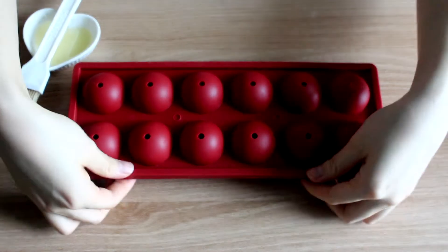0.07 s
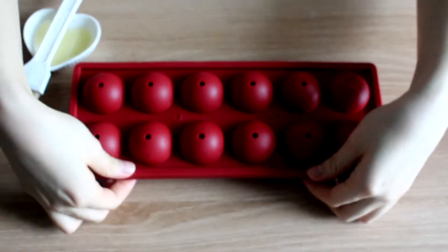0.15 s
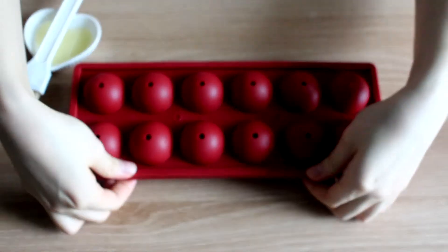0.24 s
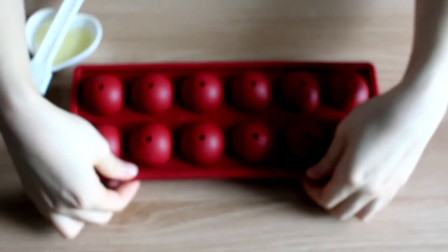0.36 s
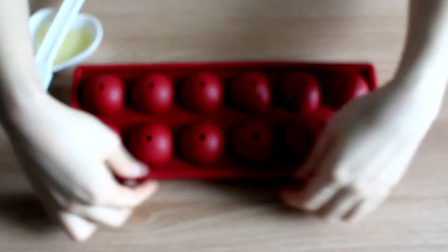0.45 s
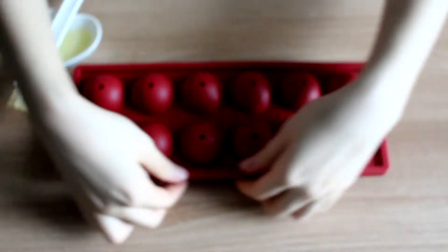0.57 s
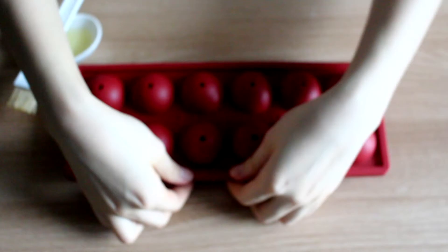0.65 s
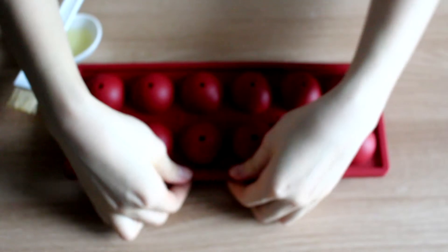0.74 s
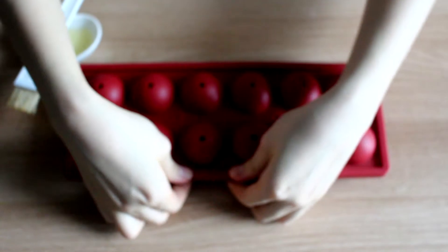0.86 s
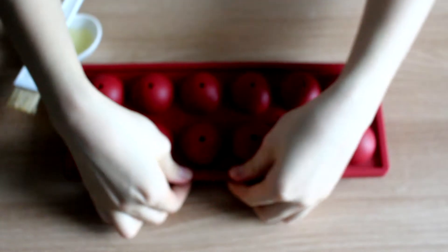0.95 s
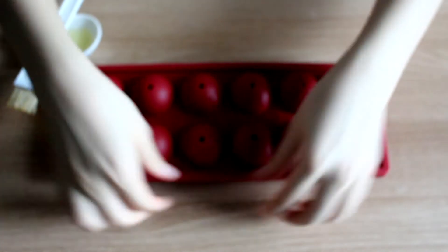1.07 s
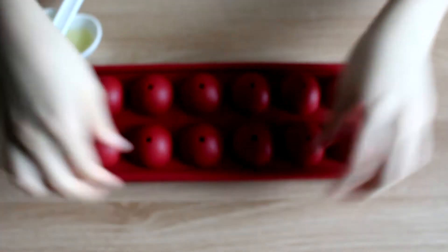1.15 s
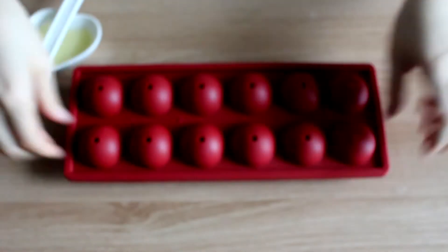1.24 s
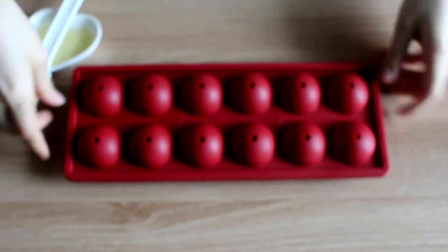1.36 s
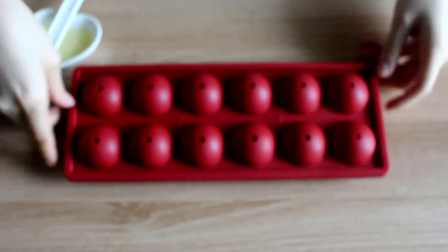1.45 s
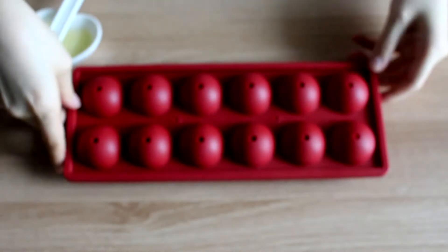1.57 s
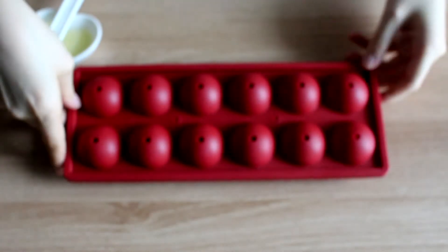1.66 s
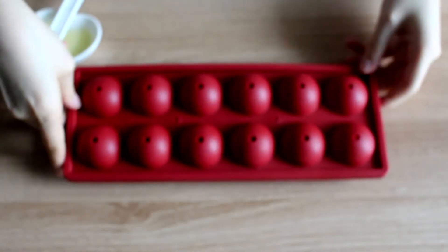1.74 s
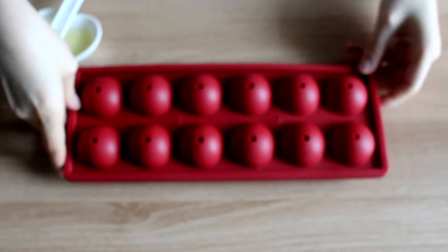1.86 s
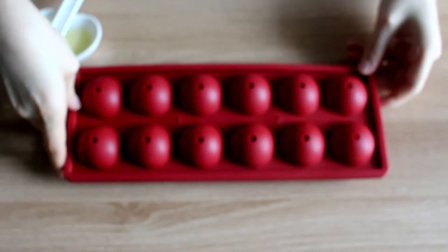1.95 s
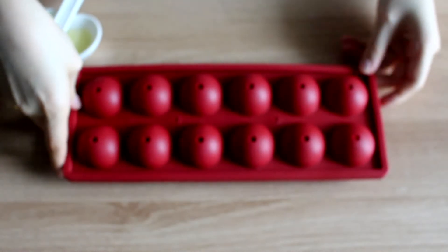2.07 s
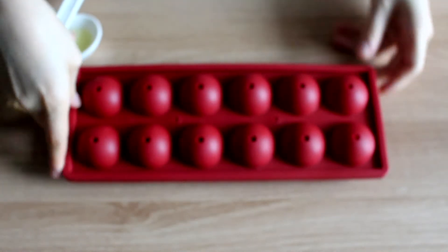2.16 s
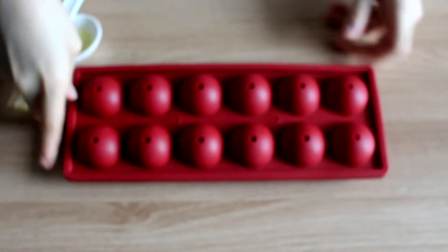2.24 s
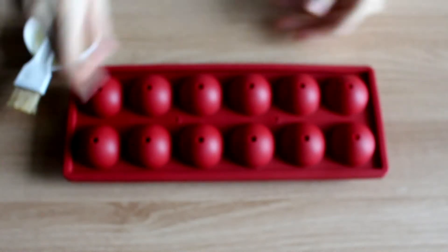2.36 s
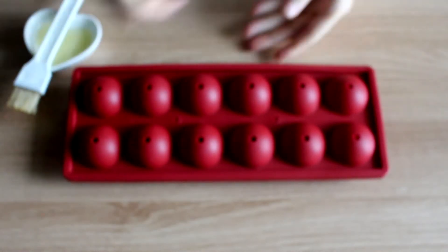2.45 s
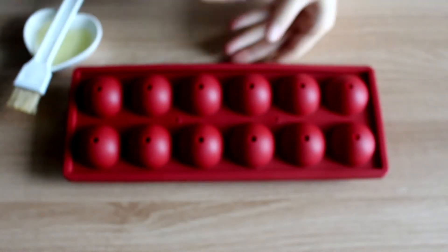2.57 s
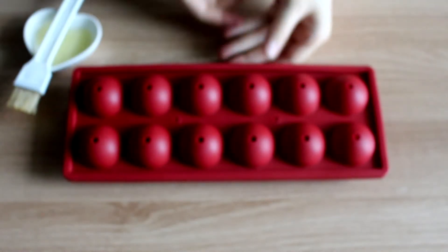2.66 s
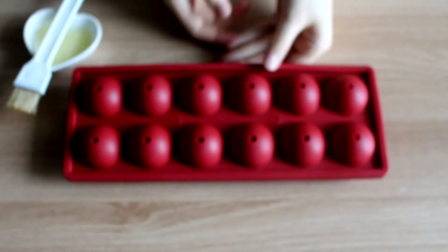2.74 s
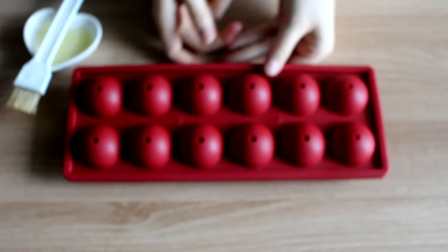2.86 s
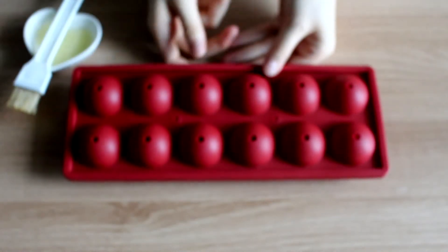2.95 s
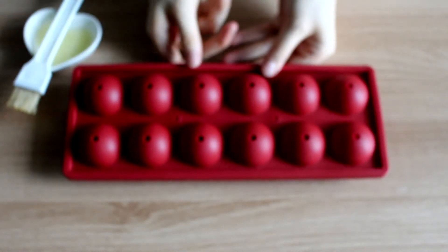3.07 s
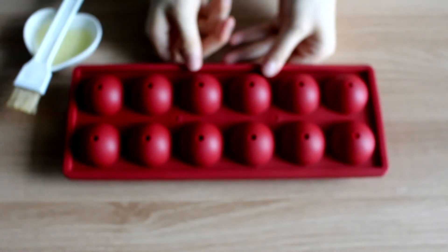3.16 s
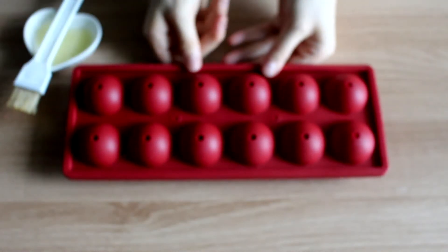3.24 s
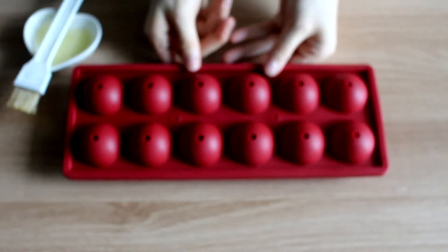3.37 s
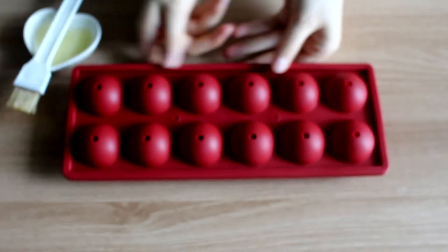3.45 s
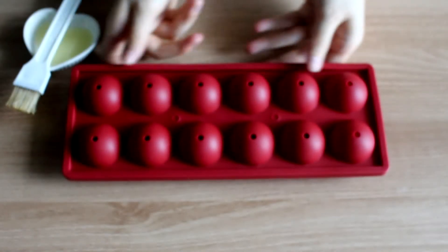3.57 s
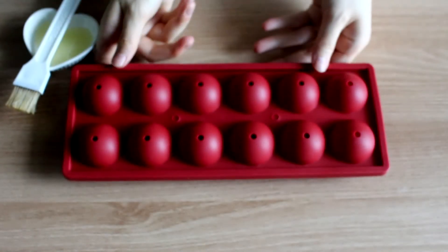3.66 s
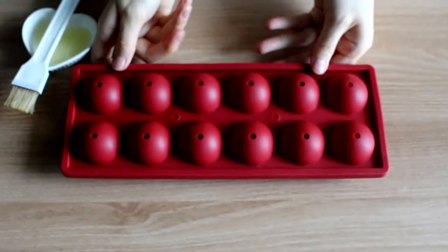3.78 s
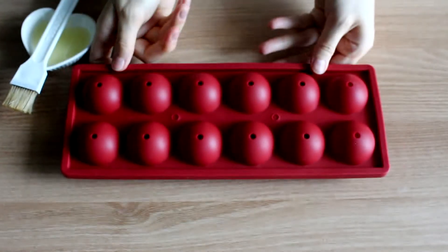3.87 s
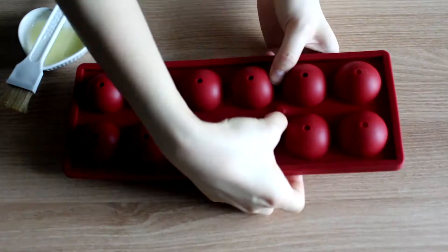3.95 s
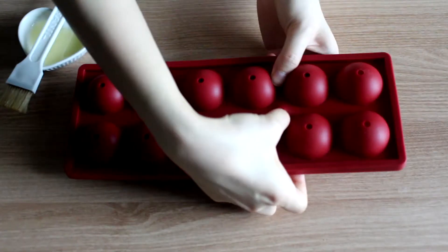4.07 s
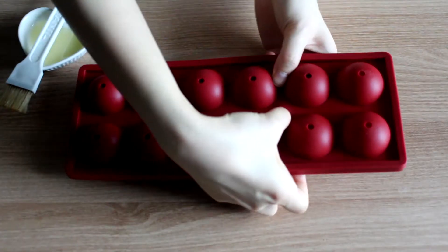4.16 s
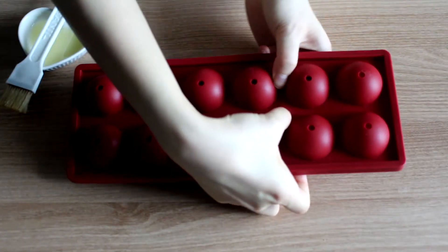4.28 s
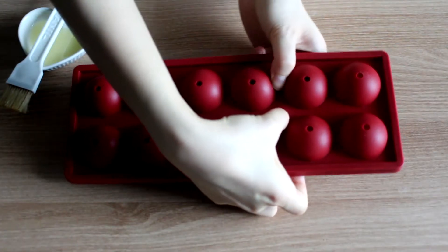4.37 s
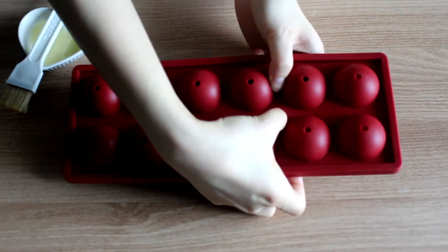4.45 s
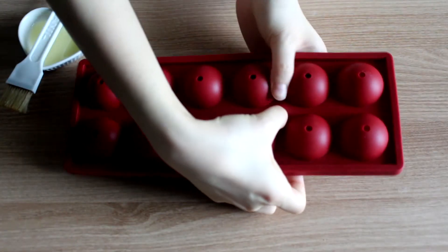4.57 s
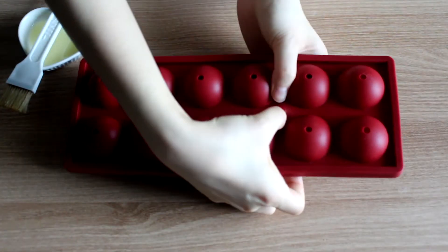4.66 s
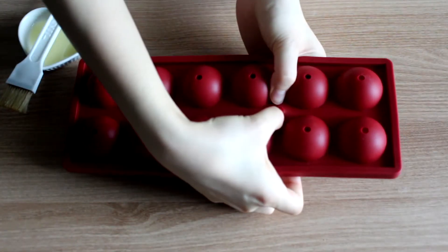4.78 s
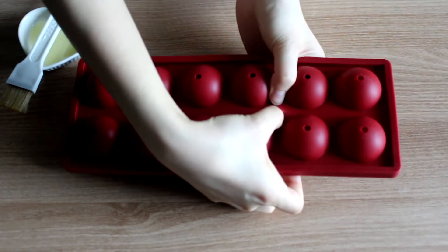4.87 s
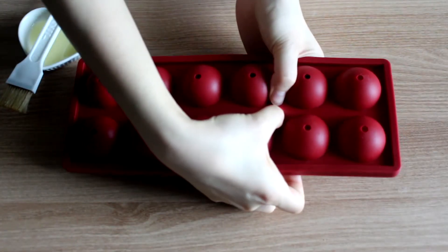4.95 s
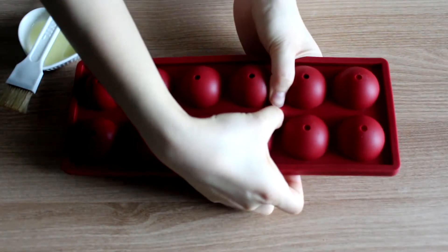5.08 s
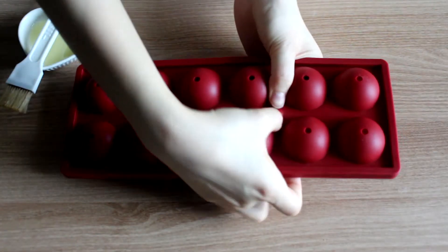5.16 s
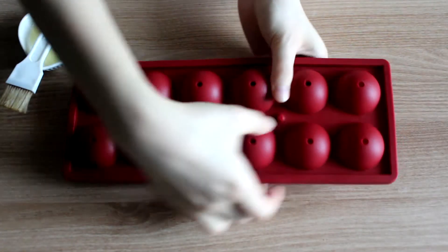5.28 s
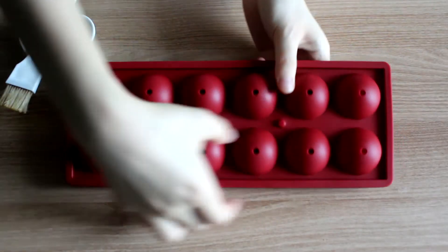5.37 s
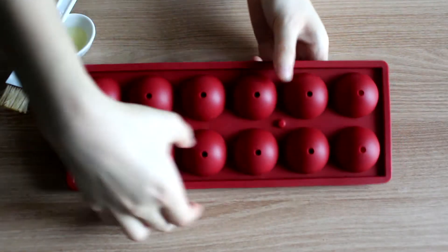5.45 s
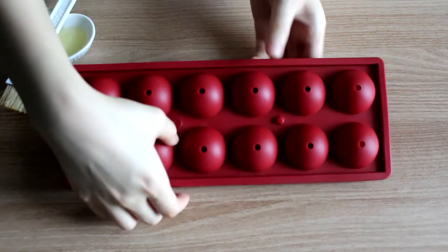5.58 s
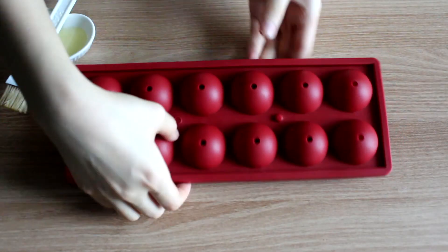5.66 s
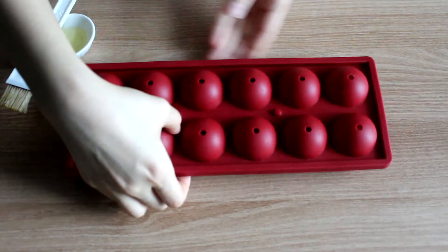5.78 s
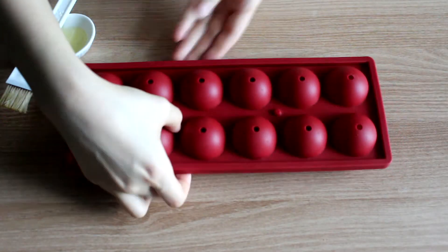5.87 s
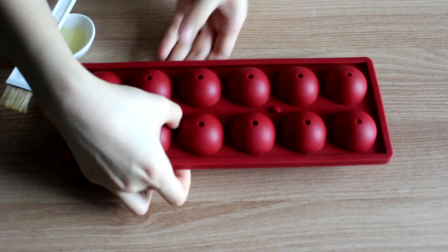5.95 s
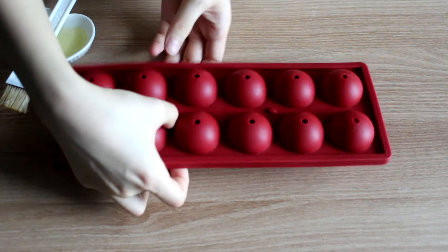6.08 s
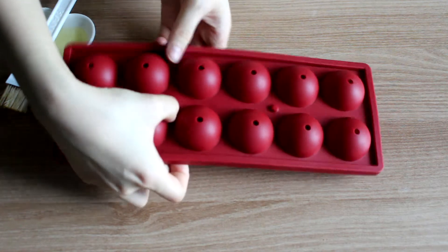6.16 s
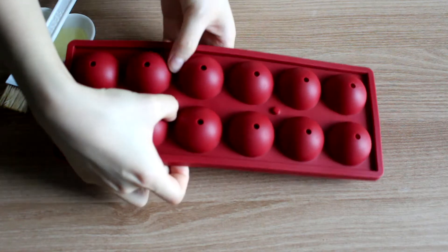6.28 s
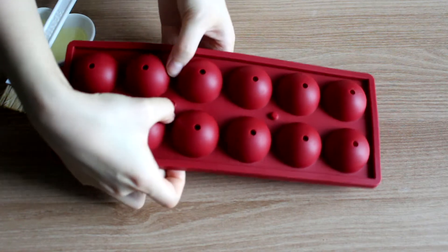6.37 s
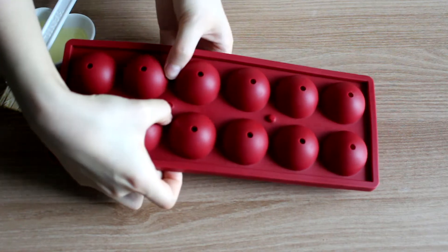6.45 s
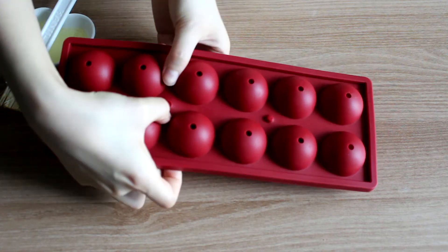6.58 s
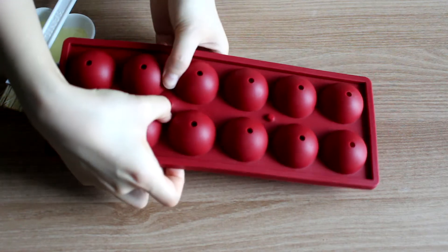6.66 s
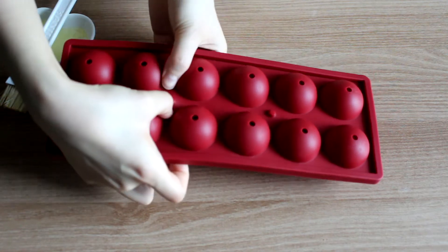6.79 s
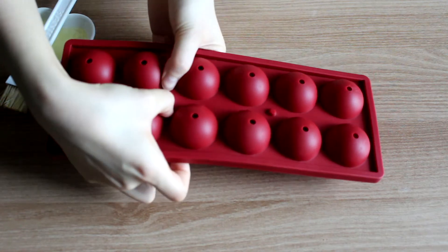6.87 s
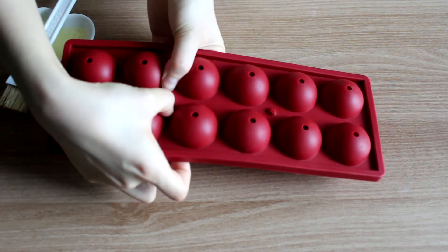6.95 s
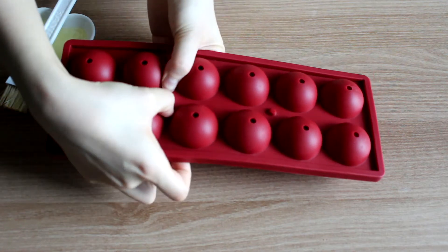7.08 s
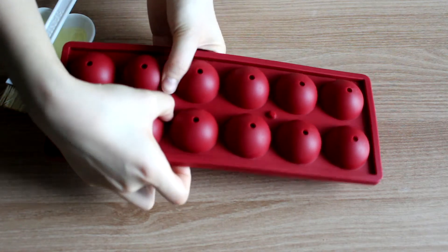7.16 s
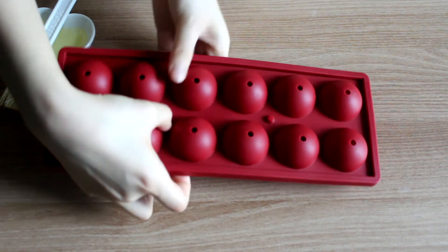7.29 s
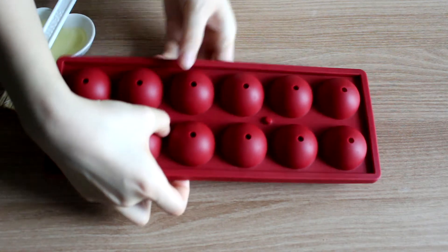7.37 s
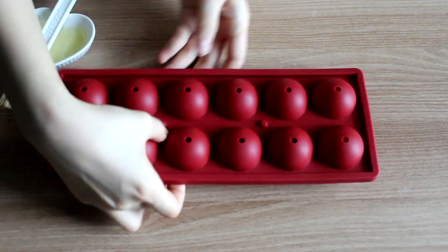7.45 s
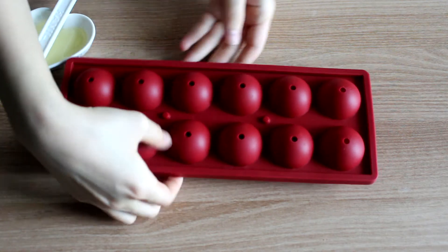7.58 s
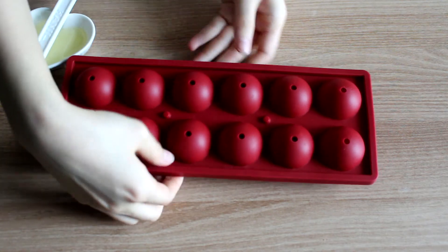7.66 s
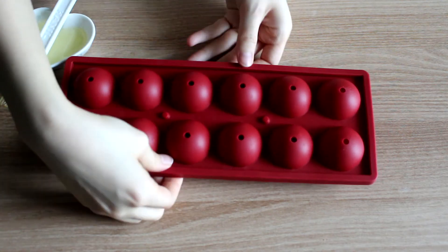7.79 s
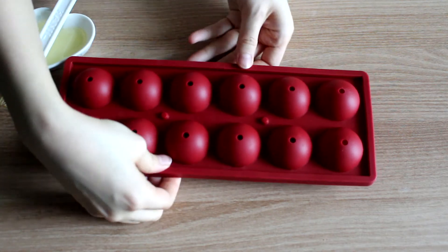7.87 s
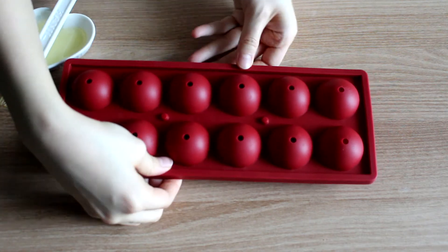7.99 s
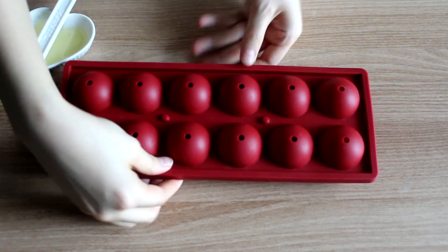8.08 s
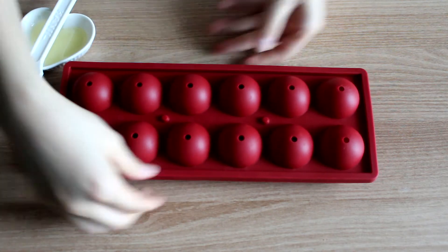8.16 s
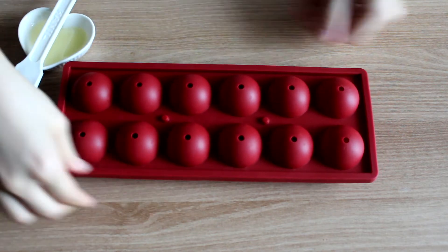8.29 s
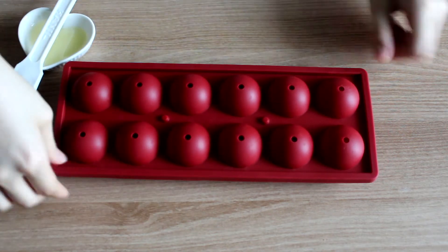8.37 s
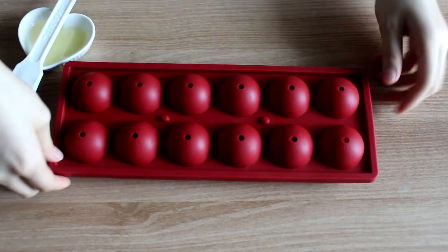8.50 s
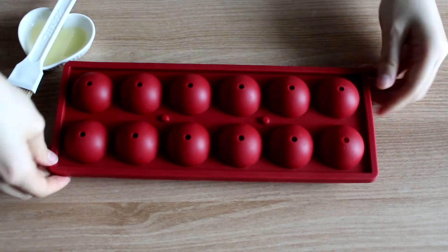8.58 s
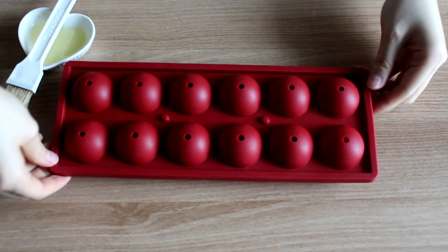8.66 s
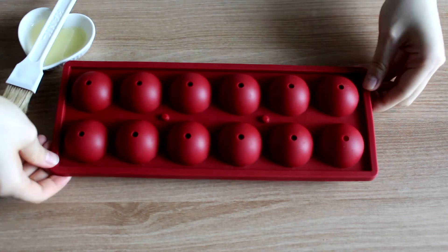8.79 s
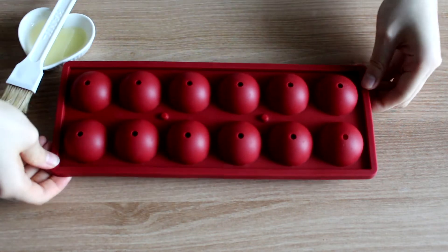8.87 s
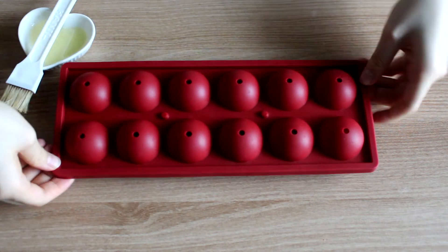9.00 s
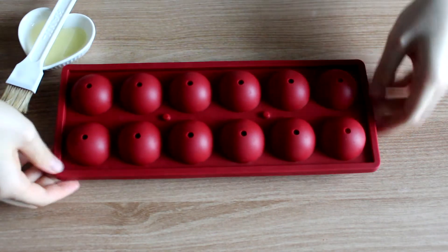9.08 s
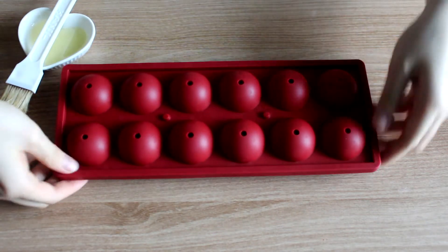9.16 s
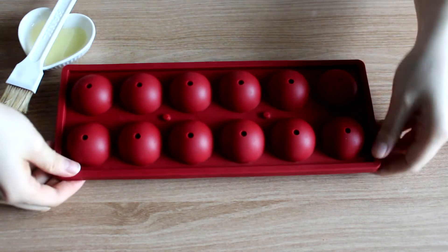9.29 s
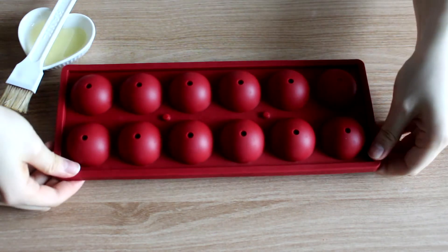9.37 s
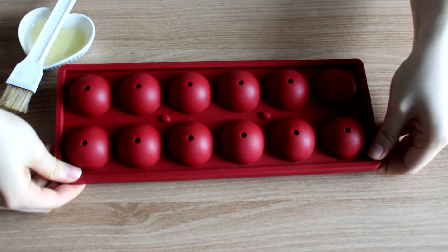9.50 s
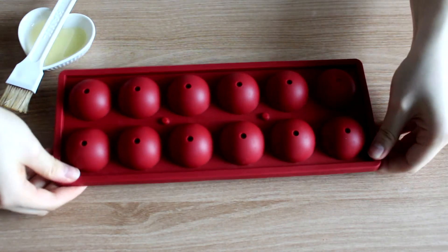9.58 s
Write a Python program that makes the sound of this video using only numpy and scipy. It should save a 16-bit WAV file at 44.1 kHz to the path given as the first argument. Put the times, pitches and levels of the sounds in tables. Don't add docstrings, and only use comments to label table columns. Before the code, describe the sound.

A close stereo microphone in a small room picks up fingers pressing a silicone mould on a wooden table. Soft hiss and a faint low appliance hum run throughout, with rubber creeping quietly on wood. At 0.4 s a light press pops the rubber; firmer knocks follow at 0.75, 1.05 and 1.36 s, each with a dull table push and short ring. Small pops and ticks come around 2.1 s, brighter knocks at 2.9 and 3.4 s. From 3.75 to 3.9 s a flurry of knocks joins a short groan sinking in pitch, cut off abruptly. Soft pats, ticks and tiny creaks continue until presses at 5.4 s and the loudest, hardest knock at 5.74 s. Light rubbing and touches lead to a tight cluster of hollow pops and snaps around 7.5 s. Softer contacts at 8.1 and 9.1 s precede a final dull knock at 9.6 s.

```python
import sys
import numpy as np
from scipy import signal
from scipy.fft import rfft, irfft, next_fast_len
from scipy.io import wavfile
from scipy.ndimage import map_coordinates

SR = 44100
rng = np.random.default_rng(int(sys.argv[2]) if len(sys.argv) > 2 else 0)


def gain_from_db(level_db):
    decades = np.asarray(level_db, float) / 20
    return 10 ** decades


def log_audio(samples):
    frames = np.atleast_2d(samples).T
    limited = np.clip(frames, -1, 1)
    pcm = np.round(limited * 32767).astype(np.int16)
    wavfile.write(sys.argv[1], SR, pcm)


N = 424683
LONG = 12288
OVERTONE_SLAP_DB = -15

# t/s, half width/s
CUTS = [
    (3.915, 0.0075),
]


def unit(x):
    return x / np.sqrt(np.mean(x ** 2) + 1e-20)


def along(points, hz):
    f, v = np.transpose(points)
    return np.interp(np.log(hz + 1), np.log(f + 1), v)


def curves(rows):
    s, *cols = np.transpose(rows)
    return [np.interp(np.arange(N) / SR, s, c) for c in cols]


def filtered(x, response):
    m = next_fast_len(x.shape[-1] + 8192)
    spectrum = rfft(x, m) * response(np.fft.rfftfreq(m, 1 / SR))
    return irfft(spectrum, m)[..., :x.shape[-1]]


def band(hz, centre_hz, width_hz):
    return 1j * hz * width_hz / (centre_hz ** 2 - hz ** 2 + 1j * hz * width_hz)


def plateau(hz, low_hz, high_hz, steep):
    return 1 / np.sqrt((1 + (low_hz / (hz + 1)) ** 4) * (1 + (hz / high_hz) ** steep))


def until_cut(s, length):
    t = s + np.arange(length) / SR
    return np.prod([(s > cut) | (t < cut) for cut, _ in CUTS], axis=0)


def contact(t, seconds):
    u = t / seconds
    return u * np.exp((1 - u ** 1.103) / 1.14)


def slips(per_second, scatter_db):
    hit = rng.random(N) < per_second / SR
    strength = gain_from_db(scatter_db * rng.standard_normal(N).clip(-2, 2))
    return unit(hit * strength * rng.choice([-1, 1], N))


def effort(rows, rise_db=122.5, fall_db=85, rest_db=-80):
    t = np.arange(N) / SR
    power = gain_from_db(rest_db) ** 2
    for s, hold, db in rows:
        early, late = (s - t).clip(0), (t - s - hold).clip(0)
        power = power + gain_from_db(db - rise_db * early - fall_db * late) ** 2
    return np.sqrt(power)


def contacts():
    # t/s, peak/dB, pop f/Hz, tick/dB, slap/dB
    knocks = [(0.414, -38, 1110, -19, -1.5), (0.7538, -17.5, 594, -17, -12), (1.0548, -21, 690, -32, -14.5),
              (1.364, -29, 393, -31, -15), (1.372, -30.5, 360, -11, -14), (2.11, -28, 764, -20, -14),
              (2.937, -27.5, 645, -10.5, -10), (3.43, -28, 710, -15.5, -12), (3.766, -43, 720, -19, 2.5),
              (3.784, -25.5, 623, -34, -12), (3.806, -32, 376, -34, -11), (3.821, -23.5, 334, -21, -14),
              (3.842, -28.5, 377, -26, -13), (3.9598, -40.5, 1820, -1, -8), (5.211, -35.5, 1550, -22, -9),
              (5.446, -27.5, 627, -23, -5), (5.7378, -5.5, 1110, -26.5, -17.5), (5.997, -27, 228, -34, -18),
              (7.458, -38, 640, -12, -1), (7.532, -18, 1054, -22, -7), (7.5568, -18.5, 1290, -25, -8),
              (7.578, -23.5, 1090, -26, -10), (8.099, -30.5, 1290, -34, -6.5), (9.625, -27.5, 900, -14, -2)]
    # t/s, peak/dB, pop f/Hz, tick/dB
    ticks = [(0.679, -41.5, 610, -10), (1.854, -40.5, 660, -12), (2.08, -51, 579, -4.5),
             (2.464, -44.5, 646, -5.5), (3.423, -45, 1020, -14), (4.523, -50.5, 546, -3.5),
             (4.558, -51.5, 570, -2.5), (4.584, -51, 626, -19), (5.121, -64, 590, -16),
             (5.159, -42, 610, -11), (5.237, -45, 566, -6.5), (5.943, -40, 710, -8.5),
             (6.202, -46, 540, -14), (6.404, -46, 732, -9), (7.066, -59, 680, -12), (7.151, -63, 387, -15),
             (7.168, -49, 740, -5), (7.286, -46.5, 670, -10), (7.315, -41.5, 720, -6),
             (7.738, -46, 597, -6.5), (7.791, -46.5, 1180, -8), (7.898, -51, 1290, -5),
             (9.11, -39, 668, -8), (9.138, -42.5, 668, -14), (9.62, -32.5, 590, -11)]
    # t/s, peak/dB, pop f/Hz, tick/dB
    overtones = [(0.7552, -23.5, 1940, -13), (1.0654, -35, 1175, -32), (1.3658, -39, 2480, -17),
                 (2.5222, -52, 2800, -1), (2.9375, -24.5, 1160, -23), (2.96, -29.5, 1550, -25),
                 (3.4316, -30, 1165, -28), (5.1597, -41, 3730, -10), (5.7384, -20, 2340, -15),
                 (7.4914, -45, 1050, -3), (7.5547, -46, 3130, -18)]
    # t/s, peak/dB, pop f/Hz
    pats = [(0.474, -41, 1320), (1.721, -48, 760), (2.906, -45, 750), (3.253, -45, 1160), (4.006, -45, 850),
            (4.197, -47, 553), (4.6, -47, 596), (5.092, -45.5, 437), (5.613, -40.5, 553), (6.276, -42, 537),
            (6.54, -46.5, 580), (7.36, -40.5, 565), (7.483, -34, 1140), (8.122, -38, 573),
            (8.739, -38.5, 1110), (9.071, -38, 1020), (9.082, -36, 640), (9.366, -42, 820),
            (9.556, -44.5, 624)]
    # t/s, peak/dB, pop f/Hz
    pops = [(0.732, -39, 580), (1.788, -43, 670), (1.957, -47, 444), (2.1295, -33.5, 850),
            (2.1545, -33.5, 1030), (2.2085, -34.5, 312), (3.176, -39, 684), (4.149, -39, 546),
            (4.246, -36, 585), (4.861, -43.5, 415), (5.063, -44, 585), (5.271, -40.5, 570),
            (5.428, -38.5, 800), (8.472, -43.5, 302)]
    # t/s, peak/dB, pop f/Hz
    undertones = [
        (0.412, -42.5, 246),
        (0.7552, -20.5, 412),
        (2.755, -53, 256),
        (5.409, -39, 284),
        (5.449, -35, 237),
        (5.585, -39.5, 229),
        (8.744, -43, 355),
    ]
    kinds = [(knocks, ()), (ticks, (0,)), (overtones, (OVERTONE_SLAP_DB,)), (pats, (-21, -3)),
             (pops, (-20.5, -11.5)), (undertones, (-23, -41))]
    return sorted(tuple(row) + shared for rows, shared in kinds for row in rows)


def more_contacts():
    # t/s, peak/dB, pop f/Hz, tick/dB
    more_rows = [(0.687, -37.5, 1080, -13), (0.768, -32, 670, -30), (0.791, -41, 670, -30),
                 (2.968, -34, 1690, -19), (2.972, -32.5, 660, -23), (2.979, -34, 1450, -18),
                 (3.01, -46, 1660, -20), (3.7565, -43, 1020, -12), (3.7685, -44.5, 2670, -9),
                 (3.778, -37, 910, -20), (3.809, -29.5, 620, -27), (3.832, -42, 2500, -14),
                 (5.2125, -42, 2230, -20), (5.244, -38.5, 570, -30), (5.296, -42, 600, -25),
                 (5.7365, -27.5, 3110, -22), (5.7389, -17, 557, -30), (5.742, -19, 1480, -33),
                 (5.781, -19.5, 520, -28), (7.491, -31.5, 620, -27), (7.5328, -33, 2170, -27),
                 (7.533, -34, 2880, -25), (7.568, -43, 3300, -12), (7.601, -29, 1260, -22),
                 (9.122, -35.5, 704, -13), (0.408, -39, 1130, -25), (0.419, -40, 1020, -19),
                 (0.433, -51, 3220, -10), (1.0495, -36, 720, -16), (1.0548, -28.5, 1220, -28),
                 (2.089, -49, 2630, -15), (2.1345, -33, 805, -23), (2.178, -44, 1250, -22),
                 (3.207, -45, 447, -22), (3.411, -47, 1200, -4.5), (3.429, -40.5, 2950, -3),
                 (3.772, -32.5, 750, -22), (5.948, -40, 1120, -6.5), (6.28, -40, 1050, -20),
                 (8.095, -39, 1000, -19), (9.6275, -32, 1150, -25), (0.832, -46, 600, -25),
                 (1.0535, -46.5, 2740, -15), (5.448, -41, 2750, -20), (5.7385, -33, 3460, -25),
                 (5.757, -35, 2450, -20), (7.4913, -49, 2400, -13), (7.5585, -45, 3400, -17),
                 (7.558, -31, 1600, -20), (8.107, -39, 1200, -22)]
    return [row + (OVERTONE_SLAP_DB,) for row in more_rows]


def taps(answer, rows):
    out, t, f = np.zeros((2, N + SR)), np.arange(LONG) / SR, np.fft.rfftfreq(LONG, 1 / SR)
    rubber = plateau(f, 378, 1396, steep=9.8)
    skin = plateau(f, 1200, 2710, steep=8.5)
    nail = plateau(f, 4030, 8900, steep=9.6)
    fade = np.clip((t[-1] - t) / .03 - .5, 0, 1)
    for s, db, hz, tick_db, slap_db in rows:
        bright = skin + gain_from_db(min(2.14 * tick_db - 4.5, 6)) * nail
        tick_s = np.clip(.0008 - .00006 * tick_db, .0004, .003)
        grain = rfft(rng.standard_normal((2, LONG)))
        lumps = gain_from_db(1.5 * np.interp(t, np.arange(100) * .003, rng.standard_normal(100)))

        pop = contact(t, 0.0019) * np.sin(2 * np.pi * hz * t)
        slap = contact(t, 0.0023) * unit(irfft(grain[0] * rubber))
        tick = contact(t, tick_s) * unit(irfft(grain[1] * bright))
        direct = pop + gain_from_db(slap_db + 1.5) * slap + gain_from_db(tick_db + 5.5) * tick

        pop_power = gain_from_db(3.0) * abs(band(f, hz, 220 + 0.15 * hz)) ** 4
        slap_power = (gain_from_db(slap_db + 4.0) * rubber) ** 2
        tick_power = (gain_from_db(tick_db + 4.0) * bright) ** 2
        colour = np.sqrt(pop_power + slap_power + tick_power)
        echoes = lumps * answer(table_db=-15.0, room_db=1.0, wide_db=-10.0)
        tail = irfft(rfft(echoes) * colour) * (1 - np.exp(-t / 0.0018)) * fade
        heard = gain_from_db(db - 4.5) * (direct + tail)
        out[:, round(s * SR):][:, :LONG] += heard * until_cut(s, LONG)
    return out[:, :N]


def snaps():
    # t/s, peak/dB, centre f/Hz
    snap_rows = [(0.76, -30, 4600), (1.855, -35, 2940), (2.112, -40, 5100), (2.9366, -38, 3500),
                 (3.757, -47, 3000), (3.7695, -41, 4300), (3.778, -41, 2600), (3.786, -42, 2400),
                 (3.812, -45, 2800), (3.8222, -40, 5000), (3.9602, -30, 3500), (4.199, -40, 1400),
                 (5.1607, -33, 3400), (5.2122, -34.5, 1540), (5.2355, -38, 3800), (5.7362, -31, 2900),
                 (6.218, -40, 2200), (6.37, -45, 2200), (6.4064, -41, 2400), (6.494, -47, 2500),
                 (7.258, -41, 3100), (7.484, -37, 1300), (7.5566, -16, 1100), (7.5795, -31, 1100),
                 (7.568, -30, 1200), (9.084, -40, 2500), (5.092, -43, 800), (5.4285, -37, 900),
                 (5.6145, -43, 1500), (3.208, -51, 700), (2.907, -47, 1700), (2.2095, -40, 900),
                 (2.4635, -52, 900), (3.4318, -38, 1300), (8.7402, -39, 1050), (9.3665, -41, 1200),
                 (5.9465, -43, 1100), (6.03, -45, 1200), (6.05, -48, 1200), (7.4915, -38, 1500),
                 (2.1555, -44, 1300), (1.7205, -52, 990), (6.541, -48, 1000), (4.008, -48, 1100),
                 (4.862, -52, 1500), (7.068, -55, 900), (1.856, -43, 1200)]
    decay_cycles, mirror_s, mirror_db = 0.93, 0.00138, -9.5
    out, t = np.zeros(N + SR), np.arange(SR // 100) / SR
    for s, db, hz in snap_rows:
        snap = gain_from_db(db + 4.5) * np.sin(2 * np.pi * hz * t) * np.exp(-t * hz / decay_cycles)
        out[round(s * SR):][:len(t)] += snap
        out[round((s + mirror_s) * SR):][:len(t)] += gain_from_db(mirror_db) * snap
    return filtered(out[:N], lambda f: plateau(f, 320, 9700, steep=8.7))


def creaks():
    creak_rows = [(0.472, 0.033, -47.5, 261), (0.757, 0.053, -35, 665), (1.092, 0.055, -51, 810),
                  (1.118, 0.032, -53, 1196), (1.2, 0.037, -61, 2700), (1.384, 0.036, -49, 644),
                  (3.134, 0.012, -50, 1210), (3.182, 0.016, -50, 694), (3.45, 0.03, -42, 677),
                  (4.31, 0.061, -57, 613), (4.569, 0.083, -53.5, 605), (5.115, 0.042, -48, 596),
                  (5.39, 0.033, -51, 586), (5.746, .03, -30, 1282), (5.866, 0.021, -47.5, 1604),
                  (6.105, .02, -56, 845), (6.271, 0.044, -47, 626), (6.308, .035, -60, 987),
                  (6.41, .04, -54, 648), (8.978, .05, -57, 658), (8.99, .04, -54, 1145),
                  (8.748, .06, -57, 1070), (8.742, .018, -47, 600), (8.768, .018, -55, 610),
                  (3.148, .012, -54, 1300), (0.7545, .012, -35, 1080), (5.758, .02, -33, 1330),
                  (7.312, .016, -47, 740), (7.46, .02, -48, 720), (7.534, .008, -33, 704),
                  (7.546, 0.0091, -29, 830), (7.562, .014, -29, 900), (7.49, 0.045, -45, 640),
                  (1.362, 0.015, -42, 630), (1.06, .03, -47, 820), (2.53, .07, -63, 1340),
                  (5.53, 0.033, -51, 600), (2.985, .05, -54, 1750), (0.835, 0.052, -53, 690),
                  (5.8, .016, -37, 1150)]
    out = np.zeros(N + SR)
    all_knots = rng.standard_normal((len(creak_rows), 2, 40))
    for (s, length, db, hz), knots in zip(creak_rows, all_knots):
        t = np.arange(round(length * SR)) / SR
        shake, bend = [map_coordinates(row, [t * 250]) for row in knots]
        tone = np.sin(2 * np.pi * np.cumsum(hz * (1 + .04 * bend)) / SR)
        swell = np.sin(np.pi * t / length)
        out[round(s * SR):][:len(t)] += gain_from_db(db + 2.0 * shake) * swell * tone
    return out[:N]


def pushes():
    # t/s, level/dB, length/s
    push_rows = [(0.473, -46.5, .09), (0.681, -52, 0.081), (0.757, -48, 0.099), (1.053, -59, 0.08),
                 (1.361, -38, 0.1), (1.723, -53.5, 0.11), (2.132, -54.5, .09), (2.205, -46, 0.1),
                 (2.463, -54, 0.1), (3.498, -49, 0.083), (3.429, -54.5, .09), (3.784, -48, .09),
                 (3.821, -47, .09), (4.57, -60, 0.084), (5.425, -51, 0.065), (5.448, -41, 0.067),
                 (5.738, -30.5, .09), (5.943, -53, .07), (5.996, -42.5, .08), (6.202, -53.5, 0.097),
                 (7.362, -56, .09), (7.471, -52, .09), (7.533, -38, .07), (7.587, -39, 0.07),
                 (8.125, -49.5, 0.082), (8.471, -54, 0.093), (8.743, -49, 0.083), (9.108, -47, 0.075),
                 (9.365, -50.5, 0.066), (9.625, -29, .09), (6.548, -56, .06), (3.255, -54, .05),
                 (7.77, -58, 0.097), (0.41, -52, .04)]
    out, t = np.zeros(N + SR), np.arange(LONG) / SR
    hum = (1 - np.exp(-t / 0.0079)) * np.sin(2 * np.pi * 207 * t)
    for s, db, length in push_rows:
        push = gain_from_db(db) * hum * np.exp(-(t / length) ** 2.65)
        out[round(s * SR):][:LONG] += push * until_cut(s, LONG)
    return out[:N]


def thumps():
    # t/s, peak/dB, rocking over it/dB
    thump_rows = [(1.052, -58, -16), (5.443, -57, -6), (5.738, -34, -22.5), (5.998, -57, -14),
                  (7.484, -58, -14), (7.53, -57, -14), (7.553, -47, -3), (8.103, -52, -16),
                  (9.07, -61, -16), (9.368, -54, -12), (9.624, -49, -16)]
    out, t = np.zeros(N + SR), np.arange(LONG) / SR
    thud = np.sin(2 * np.pi * 125 * t) * contact(t, 0.003)
    rock = gain_from_db(-60 * t / 0.5) * np.sin(2 * np.pi * 86 * t)
    for s, db, rock_db in thump_rows:
        out[round(s * SR):][:LONG] += gain_from_db(db + 7.0) * (thud + gain_from_db(rock_db) * rock)
    return out[:N]


def drag():
    # t/s, level/dB, centre f/Hz
    groan = [
        (3.748, -54, 867),
        (3.762, -47, 768),
        (3.778, -44, 708),
        (3.8, -53, 599.5),
        (3.838, -42, 383),
        (3.9, -42.5, 390),
        (3.91, -53, 388),
        (3.915, -64, 389),
    ]
    level_db, hz = curves(groan)
    t = np.arange(N) / SR
    on = (t > groan[0][0]) & (t < CUTS[0][0])
    judder = unit(filtered(rng.standard_normal((2, N)), lambda f: plateau(f, 4.3, 126, steep=2.6)))
    shaken_hz = hz * (1 + .06 * judder[1])
    tone = (1 + .5 * judder[0]) * np.sin(2 * np.pi * np.cumsum(shaken_hz) / SR)
    grit = unit(filtered(slips(2000, scatter_db=3), lambda f: plateau(f, 700, 3000, steep=5)))
    dish_s = 3.822
    dish_gain = gain_from_db(-60.0 - 60 * (t - dish_s).clip(0) / 0.28) * (t > dish_s)
    dish = dish_gain * np.sin(2 * np.pi * 6600 * t)
    return on * (gain_from_db(level_db + 2.0) * (tone + gain_from_db(-26) * grit) + dish)


def rubbing(answer):
    # start t/s, hold/s, level/dB
    strokes = [(0, 0.24, -61.5), (.69, 0.031, -56), (1.0, 0.044, -54.5), (1.45, 0.16, -60),
               (1.79, 0.087, -55.5), (2.07, 0.16, -53.5), (2.45, 0.2, -62.5), (3.02, 0.21, -58),
               (3.52, 0.035, -59.5), (3.98, 0.24, -60), (4.4, 0.31, -63.5), (4.54, 0.052, -61),
               (5.11, 0.5, -54.5), (5.74, 0.06, -50), (5.92, 0.087, -48), (6.22, 0.15, -52.5),
               (6.55, .1, -59.5), (7.2, .03, -60), (7.33, 0.045, -49), (7.52, 0.046, -44.5),
               (7.8, 0.29, -59), (8.1, 0.025, -52), (8.4, 0.27, -69), (8.99, 0.18, -54.5),
               (9.6, 0.025, -51.5)]
    # start t/s, hold/s, level/dB
    drones = [(0, 0.044, -61.5), (.7, .05, -78), (1.5, .06, -68), (1.8, 0.069, -62.5), (2.53, 0.024, -61),
              (2.8, 0.039, -57.5), (3.3, 0.024, -63.5), (5.15, 0.52, -68.5), (5.88, 0.08, -58),
              (7.5, 0.1, -53), (8.1, 0.26, -68.5), (8.95, 0.14, -67)]
    body = unit(filtered(slips(600, scatter_db=2.5),
                         lambda f: band(f, 634, 1170) ** 2 + 0.35 * band(f, 604, 60)))
    low = unit(filtered(slips(150, scatter_db=4.5), lambda f: band(f, 215.8, 23.4) ** 2))
    bright = unit(filtered(slips(1500, scatter_db=3), lambda f: plateau(f, 1300, 3600, steep=7)))
    creep = gain_from_db(-8.0) * effort(strokes) * (body + gain_from_db(-9.5) * bright)
    out = np.zeros((2, N + 2 * LONG))
    for start in range(0, N, LONG):
        place = answer(table_db=-47, room_db=-29.0, wide_db=-21.0)
        heard = signal.fftconvolve(creep[None, start:start + LONG], place, axes=1)
        out[:, start:start + heard.shape[1]] += heard
    return out[:, :N] + creep + effort(drones) * low


def brushing():
    brushes = [(.43, 0.014, -62), (.69, 0.017, -73), (1.375, 0.028, -53.5), (2.5, 0.12, -63.5),
               (3.5, 0.11, -65.5), (3.76, 0.022, -60), (4.54, .06, -61), (5.2, 0.13, -62.5),
               (5.77, 0.074, -58), (6.21, 0.24, -71), (7.2, 0.15, -65.5), (8.14, 0.024, -62.5),
               (9.0, .05, -60), (9.12, 0.024, -60), (.757, 0.021, -52), (7.558, 0.029, -51.5),
               (1.055, 0.016, -59.5), (5.742, .02, -49.5), (2.94, .03, -58)]
    mid, side = [unit(filtered(slips(2800, scatter_db=4.5), lambda f: plateau(f, 1030, 3100, steep=4.4)))
                 for _ in range(2)]
    gain = effort(brushes, rise_db=599, fall_db=185, rest_db=-100)
    return gain * (mid + gain_from_db(-5) * side * np.array([[1], [-1]]))


def surroundings():
    # f/Hz, level/dB, t60/s
    table_modes = [(208.6, -5, 0.17), (262.5, 11, 0.14), (352.8, 1, 0.24), (456.5, -2.5, 0.21),
                   (551.3, -12, 0.34), (585, 6.5, 0.15), (668, 0, 0.27), (750, -5, 0.35), (816, -6, 0.28),
                   (964, -3.5, 0.17), (1050, -0.5, 0.23), (1110, -26, 0.28), (1258, 8, 0.046),
                   (1290, -8.5, 0.34), (1382, -4, 0.15), (2340, 9, 0.069)]
    # f/Hz, t60/s
    room_decay = [(100, 0.29), (700, 0.36), (2000, 0.29), (3500, 0.33), (6000, 0.248), (12000, 0.082)]
    t = np.arange(LONG) / SR
    hz, db, t60 = np.transpose(table_modes)[..., None]
    modes = gain_from_db(db - 60 * t / t60) * np.sin(2 * np.pi * hz * t) * (1 - np.exp(-t / 0.0022))
    f, s, _ = signal.stft(t, SR, nperseg=256)
    dying = gain_from_db(-60 * s / along(room_decay, f)[:, None])
    onset = 1 - np.exp(-(t / .0045) ** 2)

    def answer(table_db, room_db, wide_db):
        chance_db = 2.5 * rng.standard_normal(len(table_modes))
        ring = gain_from_db(table_db + chance_db) * rng.choice([-1, 1], len(table_modes)) @ modes
        z = signal.stft(rng.standard_normal((2, LONG)), SR, nperseg=256)[2]
        echoes = signal.istft(z * dying, SR, nperseg=256)[1][:, :LONG]
        mid, side = gain_from_db(room_db) * onset * echoes
        return mid + ring + gain_from_db(wide_db) * side * np.array([[1], [-1]])
    return answer


def background():
    # f/Hz, level per Hz/dB
    hiss_curve = [(53, -33), (90, 3.5), (109, 5), (218, 2.5), (494, 0.5), (668, 1.5), (794, 0), (5770, -9),
                  (13700, -17.5), (15600, -20)]
    # f/Hz, side over mid/dB
    side_curve = [(60, 3), (110, 2), (200, 5.5), (380, 5.5), (700, 4.5), (1290, 5), (2380, 5.5),
                  (4400, 3.5), (8120, 1.5), (15000, 0)]
    # f/Hz, level per Hz/dB
    rumble_curve = [(18, -33), (30, -19), (45, -5.5), (58, -10), (70, -11), (85, -42), (110, -48.5)]
    noise = rng.standard_normal((4, N))
    mid = filtered(noise[0], lambda f: gain_from_db(along(hiss_curve, f)))
    side = filtered(noise[1], lambda f: gain_from_db(along(hiss_curve, f) + along(side_curve, f)))
    hiss = gain_from_db(-60.5) * np.array([mid + side, mid - side]) / np.std(mid)
    low, apart = filtered(noise[2:], lambda f: gain_from_db(along(rumble_curve, f)) * (f < 130))
    rumble = gain_from_db(-68) * np.array([low + 0.166 * apart, low - 0.5 * apart]) / np.std(low)
    waver = map_coordinates(rng.standard_normal(200), [np.arange(N) * 12 / SR])
    hum = gain_from_db(-63) * np.sin(2 * np.pi * np.cumsum(59.2 + 0.73 * waver) / SR)
    return hiss + hum + rumble


def scene():
    t, answer = np.arange(N) / SR, surroundings()
    near = taps(answer, contacts()) + taps(answer, more_contacts())
    near = near + snaps() + creaks() + pushes() + thumps() + drag() + rubbing(answer)
    around = brushing() + background()
    left_right = np.array([[-1], [1]])
    near = filtered(near, lambda f: gain_from_db(.7 * left_right * plateau(f, 1900, 3790, steep=6)))
    dips = np.prod([np.clip(abs(t - cut) / half, 0, 1) for cut, half in CUTS], axis=0)
    return (near * gain_from_db(.4 * left_right) + around) * dips * gain_from_db(.25 * left_right)


def band_limit(x):
    return signal.sosfilt(signal.butter(12, 15710, fs=SR, output="sos"), x)


def record(dry):
    return band_limit(dry)


dry = scene()
out = record(dry)
log_audio(out)
```